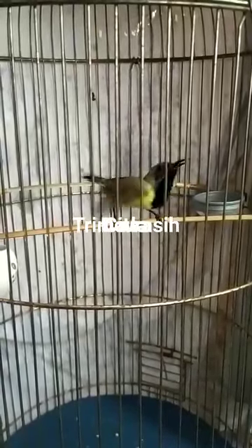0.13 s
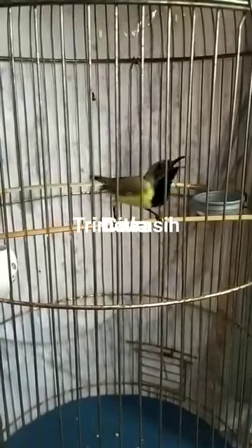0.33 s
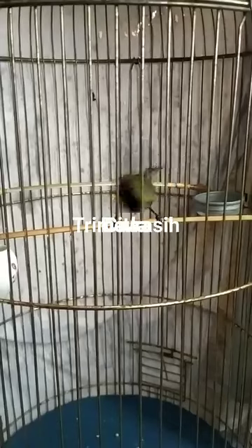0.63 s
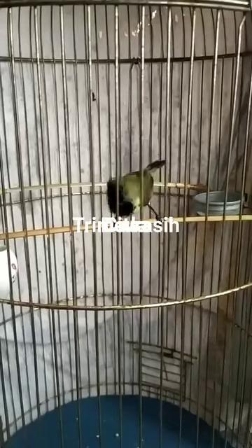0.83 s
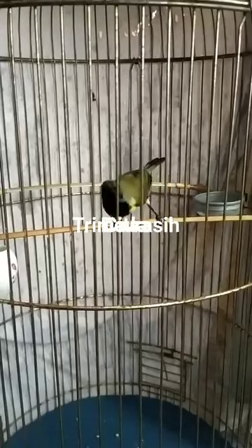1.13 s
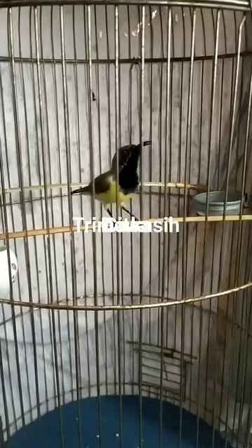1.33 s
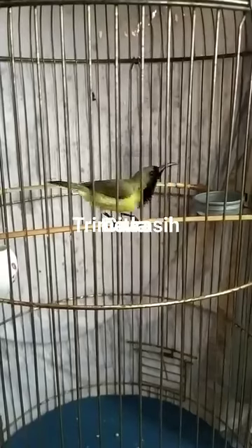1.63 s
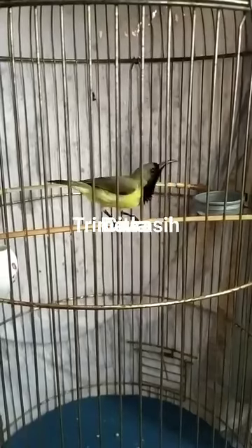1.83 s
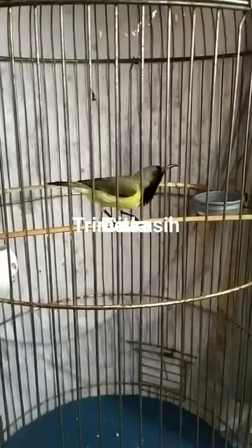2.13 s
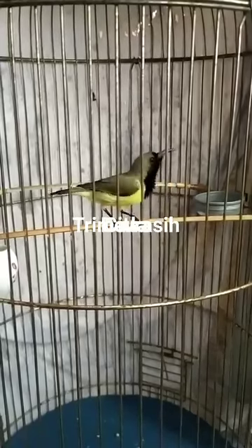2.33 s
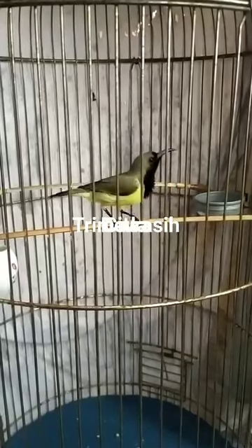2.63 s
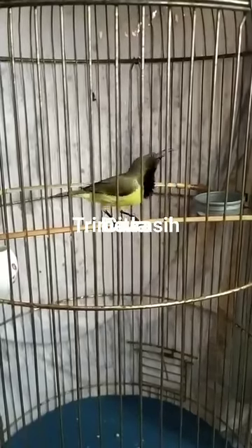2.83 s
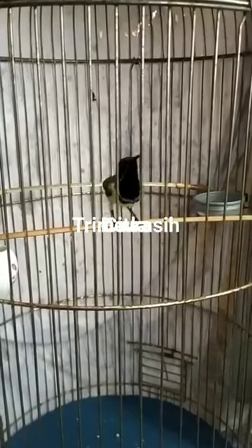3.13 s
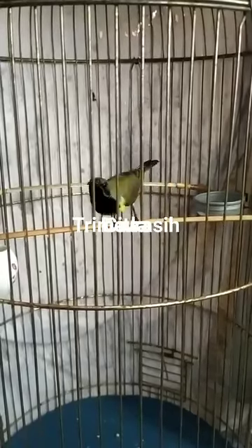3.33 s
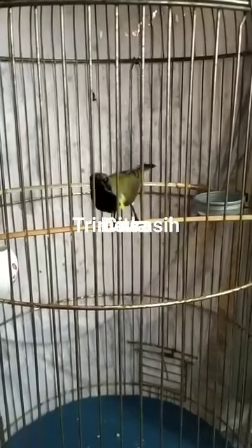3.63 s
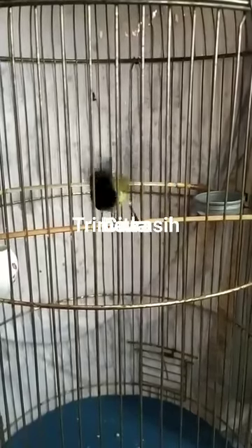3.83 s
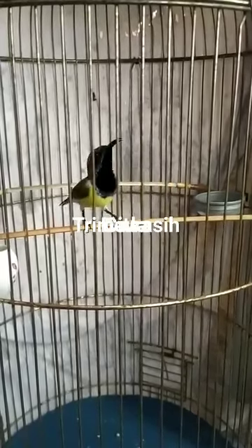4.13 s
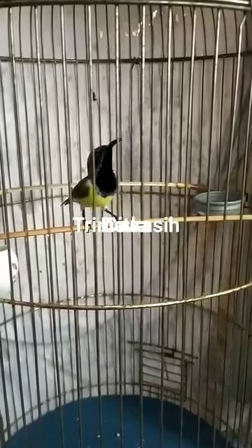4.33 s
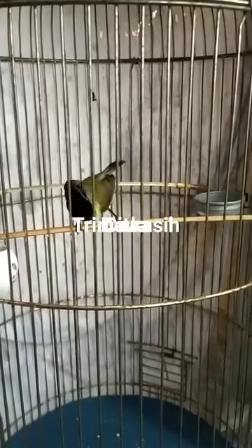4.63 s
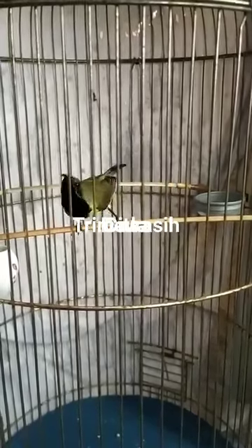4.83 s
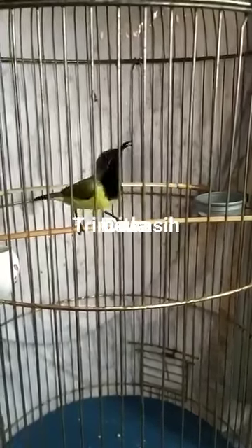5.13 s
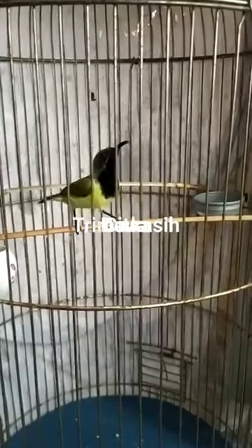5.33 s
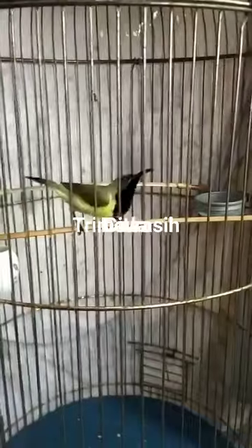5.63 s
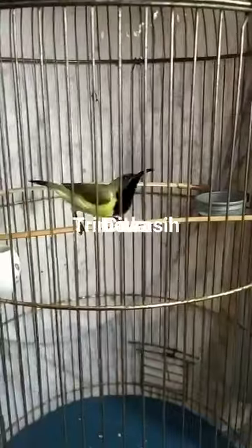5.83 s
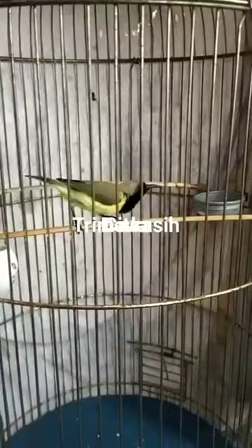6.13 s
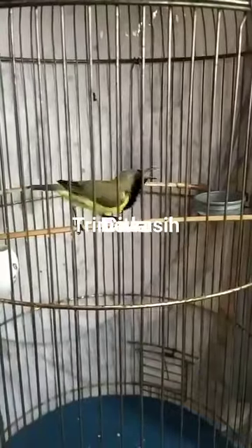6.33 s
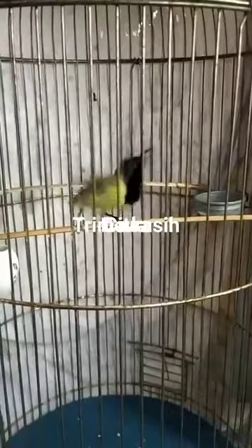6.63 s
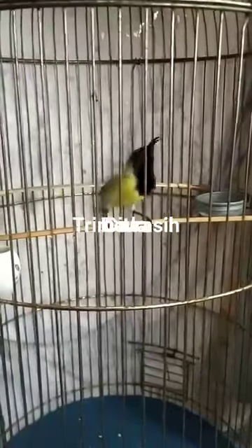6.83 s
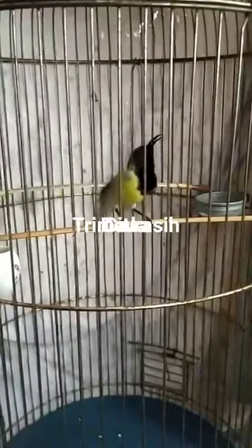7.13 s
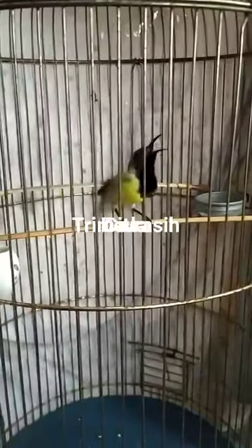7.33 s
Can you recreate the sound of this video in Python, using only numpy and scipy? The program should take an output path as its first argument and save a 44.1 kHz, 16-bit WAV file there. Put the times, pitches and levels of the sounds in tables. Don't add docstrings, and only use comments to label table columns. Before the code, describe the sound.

Bright rapid bird trills open and close, with single loud chips between, over distant echoing birdsong and a faint low town rumble.

```python
import sys
import numpy as np
from scipy import signal
from scipy.fft import rfft, irfft
from scipy.io import wavfile
from scipy.ndimage import uniform_filter1d, minimum_filter1d

SR = 44100
rng = np.random.default_rng(int(sys.argv[2]) if len(sys.argv) > 2 else 0)


def field_ratio(decibels):
    return 10 ** (np.asarray(decibels, dtype=float) / 20)


def to_wav(sig):
    pcm = np.clip(np.atleast_2d(sig), -1, 1) * 32767
    pcm = np.round(pcm).astype(np.int16)
    wavfile.write(sys.argv[1], SR, pcm.T)


N = 329868

# [t/s, level/dB, top f/Hz]
FIRST_TRILL = [(0.0304, -4, 6880), (0.1133, -5, 6754), (0.1929, -5, 6910), (0.2749, -4, 6810),
               (0.3559, -5, 6760), (0.4378, -7, 6860), (0.5208, -5.5, 6710), (0.614, -5, 6606)]
SECOND_TRILL = [(6.727, -8.5, 6283), (6.799, -6, 6590), (6.869, -4.5, 7030), (6.9464, -2.5, 7090),
                (7.0206, -3, 7060), (7.098, -2, 7200), (7.1743, -4, 7180), (7.2482, -2.5, 7204),
                (7.3273, -2.5, 7180), (7.3998, -4, 7220), (7.4734, -6.5, 7374)]
# [t/s, level/dB, left-right level/dB]
CHIPS = [(1.4452, -3.5, 4.5), (2.469, -2.5, 1), (3.0277, -2.5, 3), (3.7766, -4, 5), (4.0952, -2, 5),
         (4.6465, -8.5, 12), (5.252, -4.5, 12.5), (5.693, -2.5, 2.5)]
CHIP_HZ = 5745
# [t/s, level/dB, left-right level/dB, top f/Hz]
LONE_NOTE = (6.5, -8, 4.5, 6398.5)
# [t/s, level/dB, f/Hz]
RASPS = [
    [(0, -19.5, 5600), (0.025, -35, 5600)],
    [(6.462, -23, 5440), (6.49, -24.5, 5370)],
    [(6.708, -53, 5600), (6.725, -32, 5600)],
]

# [length/ms, start pitch factor, share where the glide turns, end pitch factor]
ARCH_GLIDE = (42, .79, .21, .63)
DIP_GLIDE = (38, 1.17, .37, 1.135)
HUMP_GLIDE = (44, .8, .52, .78)
FALL_GLIDE = (36, 1.98, .98, .99)
# [start level/dB, attack share, level after the hold/dB, release share, end level/dB]
ARCH_SWELL = (-1, 0.73, 3.5, 0.41, -14)
DIP_SWELL = (-18, .24, -4.5, .12, -20)
HUMP_SWELL = (-11, 0.43, -1, -0.2, -24)
FALL_SWELL = (-12, .17, -17, .58, -24)

# [t/s, level/dB]
FAR_TRILL = [(1.387, -19.5), (1.501, -20), (1.593, -19.5), (1.700, -19.5), (1.796, -18.5), (1.903, -19),
             (2.009, -20.5), (2.115, -19), (2.233, -17.5), (2.346, -19), (2.470, -20.5), (2.612, -22)]
FAR_HZ, FAR_PAN_DB = 2380, -3
SLAP_MS, SLAP_DB = 12, -5
# [t/s, level/dB, f/Hz]
WHISTLES = [
    [(2.972, -38, 2920), (3.022, -37.5, 3630), (3.066, -33, 3770), (3.088, -36.5, 3237), (3.174, -39, 3453),
     (3.24, -35, 2906), (3.30, -35, 3195), (3.40, -35.5, 3260), (3.44, -34, 3060)],
    [(3.88, -31, 2969), (3.90, -40.5, 3220), (3.97, -39.5, 3240), (3.984, -41, 3100), (4.015, -35, 3240),
     (4.06, -49, 3150)],
    [(5.152, -37, 3090), (5.205, -28, 3607), (5.25, -36, 4240), (5.276, -24, 3827), (5.29, -29, 3553),
     (5.345, -29.5, 3582), (5.45, -40, 3900)],
]
HOARSE_CALLS = [
    [(3.42, -39, 3077), (3.476, -41, 2852), (3.59, -42, 2590), (3.78, -40, 2658), (3.89, -43, 3130),
     (3.95, -44, 2820), (4.05, -44, 2580)],
    [(4.04, -46.5, 3030), (4.184, -39.5, 3140), (4.215, -43, 2530), (4.31, -45.5, 2476),
     (4.46, -46.5, 2790)],
    [(4.47, -43.5, 2108), (4.552, -40.5, 2674), (4.62, -45, 3150), (4.68, -44, 2590), (4.79, -45, 2550)],
]
BUZZES = [
    [(1.13, -66, 3570), (1.2, -54, 3990), (1.312, -48.5, 4650), (1.39, -44.5, 4400)],
    [(5.28, -34, 3650), (5.4, -28, 3780), (5.516, -34, 4460), (5.6, -93, 4300)],
    [(5.9, -45, 3420), (5.95, -34, 3576), (6.05, -35, 4270), (6.166, -34, 4300), (6.31, -32.5, 3680),
     (6.45, -31, 3394), (6.63, -34, 3122), (6.68, -83, 3150)],
]
# [t/s, level/dB, f/Hz]
SIGH = [(4.78, -48.5, 2470), (4.87, -59.5, 1330)]
WARBLE = [(5.855, -22, 2525), (5.869, -32, 2587), (5.875, -27, 3247), (5.893, -28, 2813),
          (5.905, -27.5, 3130), (5.912, -25.5, 3900), (5.94, -39, 3750)]

# [pitch scatter f/Hz, breath level against the voice/dB]
CLEAR = (28, -16.5)
TWITTER = (65, -5.5)
HUSKY = (125, -2)
BUZZY = (470, 1.47)
RASPY = (640, -6.5)
# [f/Hz, level/dB]
BRIGHT_BREATH = [(180, -95.5), (400, -18.5), (1000, -12), (2500, -10), (4000, 6), (5800, -5), (7300, -3.5),
                 (9500, -7), (12000, -26.5), (13500, -60), (16000, -72)]
DARK_BREATH = [(180, -48), (500, -15.5), (1100, -10.5), (2000, -9.5), (3000, 3.5), (4500, -4), (7000, -19),
               (10000, -16.5), (12500, -33.5), (14000, -50)]

# [start t/s, length t/s, level/dB, first f/Hz, last f/Hz]
COO = (3.6, .23, -52, 520, 455)
# [f/Hz, level/dB]
TOWN = [(15, -91.5), (25, -44), (40, -10), (65, -5), (114, -6.5), (160, -13.5), (260, -21), (420, -22.5),
        (970, -30), (1800, -25), (3000, -25.5), (7000, -31.5), (10000, -40.5), (14000, -59)]
TOWN_DB = -54.5
# [f/Hz, likeness 0 to 1]
TOWN_LIKENESS = [(60, 1), (150, 1), (400, 1), (1000, 0.1), (2700, 0.036), (7000, 0.21)]
# [left delay t/ms, left level/dB, right delay t/ms, right level/dB]
ECHOES = [(.6, -12, .25, -6), (1.5, -10, 1.1, -8), (3.1, -14, 2.4, -10), (5.3, -17, 4.2, -13)]

EDGES = [7650, 8500, 9500, 10600, 11450, 12900, 14400]
# [own level/dB, spill level from the song/dB, level of song copied up/dB]
TREBLE = [(-3.5, -53, -65), (-3.5, -36, -27), (-0.8, -29.5, -40), (-4.5, -69.5, -73.5), (7.5, -36.5, -33.5),
          (-17, -58, -29.5)]
# [from t/s, to t/s, f/Hz, level over the treble/dB]
TONES = [(5.68, 7.0, 10853, -8), (5.36, 6.5, 12575, -7), (0, .07, 12575, -2), (5.68, 5.74, 12575, 2.5),
         (5.84, 6.5, 8786, -5), (1.44, 1.5, 10853, -2), (1.5, 1.65, 8096, -3), (2.47, 2.75, 11542, -3),
         (4.2, 4.45, 8096, -4), (4.64, 4.8, 11542, -3)]


def near_bird():
    trills = [(s, db, 3.2, hz) for s, db, hz in FIRST_TRILL]
    trills += [(s, db, 4.8, hz) for s, db, hz in SECOND_TRILL]
    chips = [(*chip, CHIP_HZ) for chip in CHIPS]
    song = notes(trills, ARCH_GLIDE + ARCH_SWELL, -50, -33, -12, flutter=.4, blur_hz=350)
    song += notes(chips, DIP_GLIDE + DIP_SWELL, -59.5, -31.5, -42.5, flutter=.2, blur_hz=150)
    song += notes([LONE_NOTE], HUMP_GLIDE + HUMP_SWELL, -30, -27, -29, flutter=.69)
    song += held(RASPS, RASPY, BRIGHT_BREATH, 5.6, -32, -40, scatter_rate_hz=1600)
    return song * field_ratio(-6.0)


def notes(events, kind, second_db, under_db, lead_db, under_hz=3820, flutter=.04, lead_s=.013, blur_hz=300):
    out = np.zeros((2, N))
    ms, first, share, last, first_db, attack, hold_db, release, last_db = kind
    for s, db, pan_db, hz in events:
        t = np.arange(-lead_s, ms / 1000, 1 / SR)
        u = t / t[-1]
        leading = t < 0

        before = np.clip(1 - u / share, 0, 1)
        after = np.clip((u - share) / (1 - share), 0, 1)
        bend = (first - 1) * before ** 2 + (last - 1) * np.sin(np.pi * after / 2) ** 2
        hoarse_hz = hz * (.86 + .1122 * wander(len(t), 1500))
        pitch = np.where(leading, hoarse_hz, hz * (1 + bend))
        turn = 2 * np.pi * np.cumsum(pitch) / SR
        side_hz = np.where(leading, .85 * hz, pitch) - under_hz + blur_hz * wander(len(t), 500)
        side = np.sin(2 * np.pi * np.cumsum(side_hz) / SR)

        tone = np.sin(turn) + field_ratio(second_db) * np.sin(2 * turn)
        tone += field_ratio(under_db + 12 * leading) * wander(len(t), 120) * side

        swell_db = np.interp(u, [0, attack, 1 - release, 1], [first_db, 0, hold_db, last_db])
        shape_db = uniform_filter1d(np.where(leading, lead_db, swell_db), 60, mode="nearest")
        scatter = 1 + flutter * np.array([wander(len(t), 550), wander(len(t), 510)])
        level = field_ratio(db + shape_db) * scatter * signal.windows.tukey(len(t), .15)
        add(out, s - lead_s, sides(pan_db) * level * tone)
    return out


def held(tables, kind, air, pan_db, second_db, third_db, scatter_rate_hz=350, throb=.3):
    voice, breath = np.zeros(N), np.zeros(N)
    scatter_hz, breath_db = kind
    for rows in tables:
        s, *columns = np.transpose(rows)
        t = np.arange(s[0], s[-1], 1 / SR)
        db, hz = (np.interp(t, s, c) for c in columns)
        pitch = hz + scatter_hz * wander(len(t), scatter_rate_hz)
        turn = 2 * np.pi * np.cumsum(pitch) / SR
        tone = np.sin(turn) + field_ratio(second_db) * np.sin(2 * turn) + field_ratio(third_db) * np.sin(3 * turn)
        fade = signal.windows.tukey(len(t), min(.018 / (s[-1] - s[0]), 1))
        level = field_ratio(db) * fade
        add(voice, s[0], np.sqrt(2) * level * tone * (1 + throb * wander(len(t), 150)))
        add(breath, s[0], level * field_ratio(breath_db))
    noise = coloured(air, [(300, .56), (9000, .45)])
    return sides(pan_db) * (voice + breath * noise)


def far_bird():
    trill = [(s, db, FAR_PAN_DB, FAR_HZ) for s, db in FAR_TRILL]
    far = notes(trill, FALL_GLIDE + FALL_SWELL, -33.5, -66.5, -40, flutter=.35) * field_ratio(-6.0)
    far += field_ratio(SLAP_DB) * np.roll(far, int(SLAP_MS * SR / 1000), axis=1)
    far += held([WARBLE], TWITTER, BRIGHT_BREATH, .34, -18, -22) * field_ratio(-7.0)
    far += held(BUZZES, BUZZY, BRIGHT_BREATH, 1.3, -28.5, -33.5) * field_ratio(-7.0)
    hoarse = held(HOARSE_CALLS + [SIGH], HUSKY, DARK_BREATH, -.81, -49, -21, scatter_rate_hz=548, throb=.5)
    return far + hoarse * field_ratio(-4.5)


def far_whistles():
    return held(WHISTLES, CLEAR, DARK_BREATH, -1.9, -20, -23) * field_ratio(-4.0)


def dove():
    s, length, db, first_hz, last_hz = COO
    u = np.arange(0, length, 1 / SR) / length
    pitch = first_hz + (last_hz - first_hz) * u + 35 * wander(len(u), 60)
    tone = np.sin(2 * np.pi * np.cumsum(pitch) / SR)
    swell = np.sin(np.pi * u ** 1.24) * (1 + .47 * wander(len(u), 23))
    coo = np.zeros(N)
    add(coo, s, field_ratio(db) * swell * tone)
    return coo * sides(5)


def town():
    return field_ratio(TOWN_DB) * coloured(TOWN, TOWN_LIKENESS)


def yard(x, echo_db, tail_db, t60, start_s=.003):
    t = np.arange(int(.6 * SR)) / SR
    tail = rng.standard_normal((2, len(t))) * field_ratio(-60 * t / t60) * np.clip(t / start_s - 1, 0, 1)
    tail *= field_ratio(tail_db) / np.linalg.norm(tail[0])
    tail[:, 0] = 1
    for left_ms, left_db, right_ms, right_db in ECHOES:
        tail[0, int(left_ms * SR / 1000)] += field_ratio(left_db + echo_db)
        tail[1, int(right_ms * SR / 1000)] -= field_ratio(right_db + echo_db)
    return signal.fftconvolve(x, tail, axes=1)[:, :N]


def evened(x):
    return x / np.sqrt(np.mean(x ** 2) + 1e-20)


def sides(pan_db):
    return field_ratio([[pan_db / 2], [-pan_db / 2]])


def read(points, hz):
    f, value = np.transpose(points)
    return np.interp(np.log(hz + 1), np.log(f + 1), value)


def add(mix, s, sound):
    part = mix[..., round(s * SR):][..., :sound.shape[-1]]
    part += sound[..., :part.shape[-1]]


def wander(length, rate_hz):
    span = max(int(SR / rate_hz), 1)
    smooth = uniform_filter1d(rng.standard_normal(length), span)
    return evened(uniform_filter1d(smooth, span))


def coloured(spectrum, likeness):
    hz = np.fft.rfftfreq(N, 1 / SR)
    left, other = rfft(rng.standard_normal((2, N)))
    like = np.clip(read(likeness, hz), -1, 1)
    pair = np.array([left, like * left + np.sqrt(1 - like ** 2) * other])
    return evened(irfft(pair * field_ratio(read(spectrum, hz)), N))


def complex_noise(shape):
    return rng.standard_normal(shape) + 1j * rng.standard_normal(shape)


def scene():
    birds = yard(near_bird(), 0, -11, .32)
    birds += yard(far_bird(), .54, 2.4, .37)
    birds += yard(far_whistles(), .5, -3.5, .3)
    hz = np.fft.rfftfreq(N, 1 / SR)
    later = np.exp(-2j * np.pi * hz * 26e-6)
    birds[1] = irfft(rfft(birds[1]) * later, N)
    return birds + dove() + town()


def smeared(x, noise_db=-6.0, spill_db=-52, hole_db=-29, faint_db=-89, size=1024):
    z = signal.stft(x, nperseg=size, noverlap=size // 2)[2]
    bands = z[:, :size // 2].reshape(2, -1, 4, z.shape[2])
    power = (abs(bands) ** 2).mean(2, keepdims=True)
    noise = complex_noise(bands.shape)
    unsteady = field_ratio(6.7 * rng.standard_normal((2, 1, 1, z.shape[2])))
    spread = uniform_filter1d(power, 11, axis=1) * field_ratio(2 * noise_db) * unsteady
    spread += power.mean(1, keepdims=True) * field_ratio(2 * spill_db + 59)
    spread = np.minimum(spread, np.roll(spread, 1, axis=-1) * field_ratio(2 * 13.0))

    luck_db = 13 * evened(uniform_filter1d(rng.standard_normal(power[0].shape), 14, axis=-1))
    loudest_near = -minimum_filter1d(-power, size=17, axis=1)
    masked = (loudest_near * field_ratio(2 * hole_db) + field_ratio(2 * faint_db)) * field_ratio(luck_db)
    above_bass = (np.arange(size // 8) > 9)[:, None, None]
    starved = (luck_db > 19) & (power < masked * field_ratio(2 * 14)) & above_bass
    kept = np.where((power > masked) & ~starved, 1, field_ratio(-40))
    noisy = bands + np.sqrt(abs(spread) / 2) * noise
    z[:, :size // 2] = (noisy * kept).reshape(2, size // 2, -1)
    return signal.istft(z, nperseg=size, noverlap=size // 2)[1][:, :N]


def rebuilt(full, lower, keep=.94, alike=.17, hold=7, size=256):
    hz, t, z = signal.stft(lower, SR, nperseg=size)
    true = signal.stft(full, SR, nperseg=size)[2]
    power = uniform_filter1d(abs(true) ** 2, hold, axis=2)
    song = power[:, (hz > 3000) & (hz < EDGES[0])].mean(1, keepdims=True)

    one_step = np.roll(z, 22, axis=1)
    two_steps = np.roll(z * (hz < 6750)[:, None], 44, axis=1)
    moved = np.where((hz < EDGES[3])[:, None], one_step, two_steps)
    moved *= np.clip(uniform_filter1d(abs(moved), size=5, axis=2) / field_ratio(-17), 0, 1) ** .55
    moved *= .5 + .8 * rng.standard_normal(z.shape[1:])

    band, top = np.zeros_like(power), np.zeros_like(z)
    for low, high, (own_db, spill_db, copy_db) in zip(EDGES, EDGES[1:], TREBLE):
        inside = (hz >= low) & (hz < high)
        luck = rng.standard_normal(len(t) // 12 + 1)
        blocks = field_ratio(3 * np.repeat(luck, 12)[:len(t)])
        own = field_ratio(2 * own_db) * power[:, inside].mean(1, keepdims=True)
        band[:, inside] = own + field_ratio(2 * spill_db) * song * blocks ** 2
        top[:, inside] = field_ratio(copy_db) * blocks * moved[:, inside] + keep * field_ratio(own_db) * true[:, inside]

    noise = complex_noise(z.shape)
    noise[1] = alike * noise[0] + np.sqrt(1 - min(alike, 1) ** 2) * noise[1]
    unsteady = evened(uniform_filter1d(rng.standard_normal(z.shape[1:]), size=24, axis=1))
    top += np.sqrt(abs(band)) * noise * field_ratio(3.5 * unsteady)

    heard = uniform_filter1d(uniform_filter1d(abs(top) ** 2, 25, axis=2), 3, axis=1)
    luck_db = 8 * evened(uniform_filter1d(rng.standard_normal(z.shape[1:]), 30, axis=1))
    faint_db = -99 + 7.0 * (hz[:, None] - EDGES[0]) / 3000
    top *= heard > field_ratio(2 * faint_db + luck_db)
    top *= heard > field_ratio(2 * -47) * song * field_ratio(luck_db)
    z = np.where((hz >= EDGES[0])[:, None], top, z)
    out = signal.istft(z, SR, nperseg=size)[1][:, :N]

    time = np.arange(N) / SR
    row = np.argmin(abs(hz - 9000))
    strength = np.array([np.interp(time, t, np.sqrt(abs(b[row]))) for b in band])
    for t0, t1, tone_hz, db in TONES:
        on = np.clip(np.minimum(time - t0, t1 - time) / .01, 0, 1)
        out = out + 4 * field_ratio(db) * on * strength * np.sin(2 * np.pi * tone_hz * time)
    return out


def band_limit(x):
    return signal.sosfilt(signal.butter(12, 15200, fs=SR, output="sos"), x)


def record(dry):
    mix = np.clip(rebuilt(dry, smeared(dry)), -1, 1)
    return band_limit(mix)


dry = scene()
out = record(dry)
to_wav(out)
```